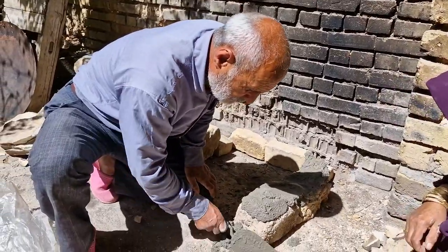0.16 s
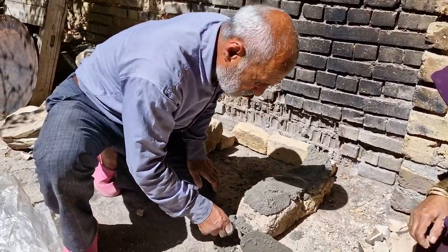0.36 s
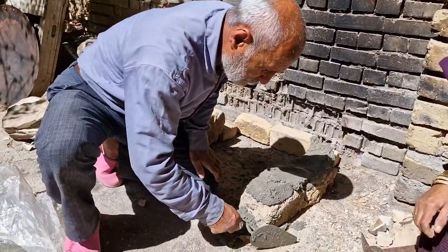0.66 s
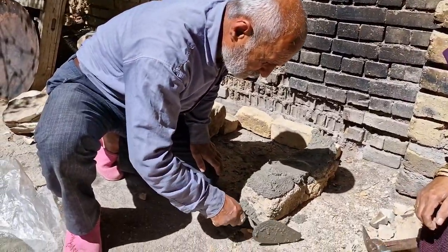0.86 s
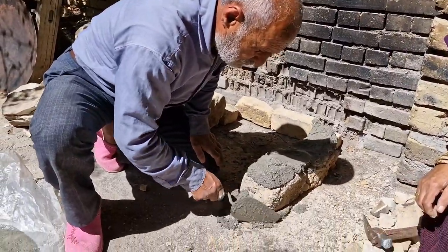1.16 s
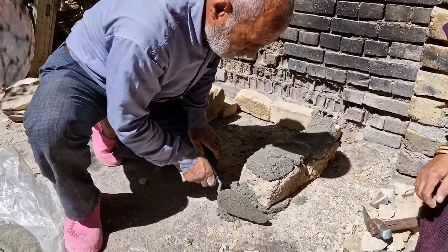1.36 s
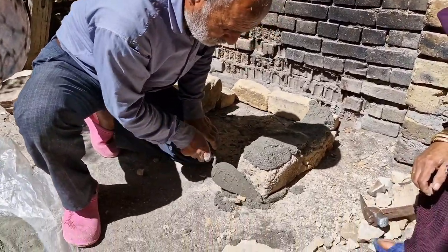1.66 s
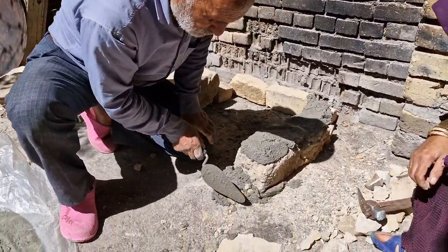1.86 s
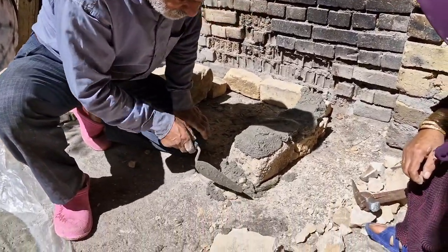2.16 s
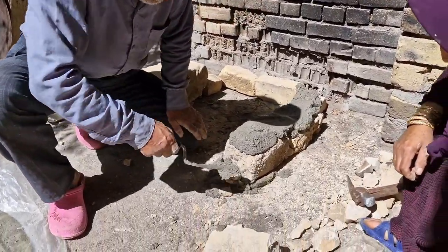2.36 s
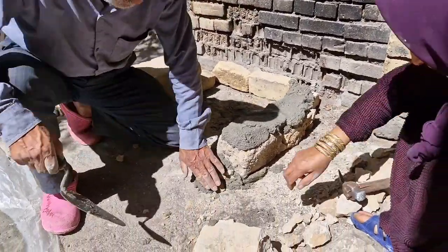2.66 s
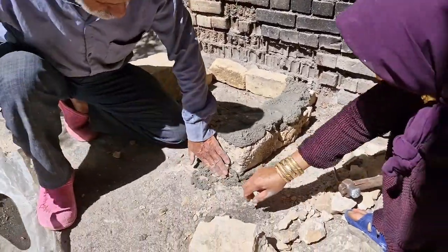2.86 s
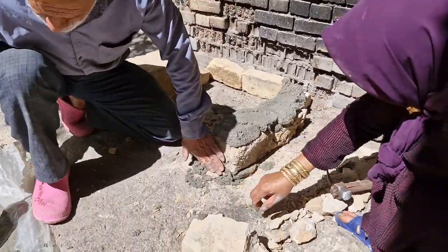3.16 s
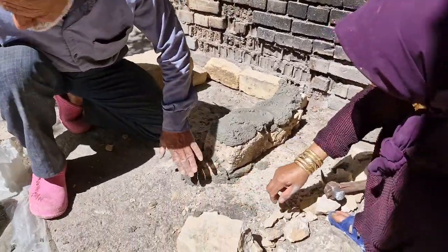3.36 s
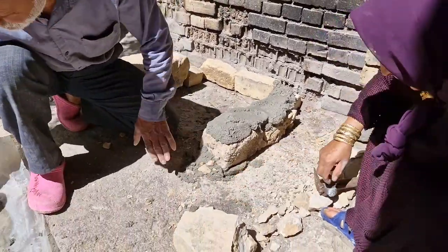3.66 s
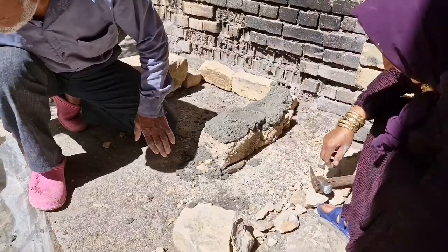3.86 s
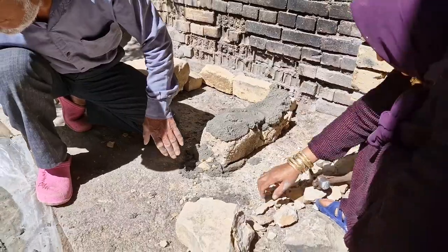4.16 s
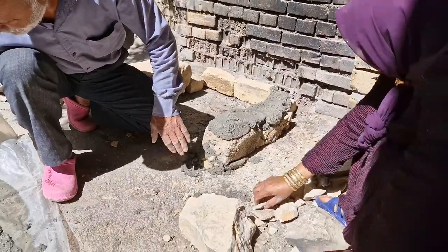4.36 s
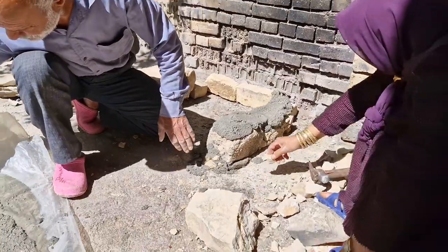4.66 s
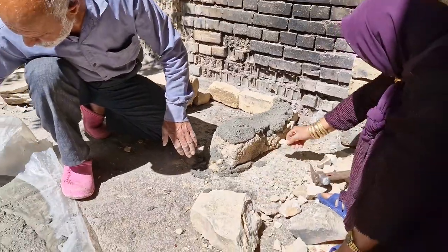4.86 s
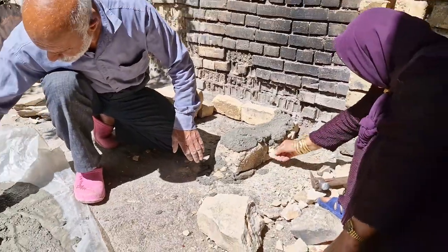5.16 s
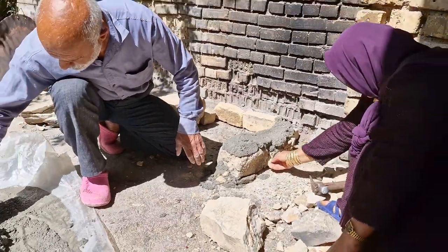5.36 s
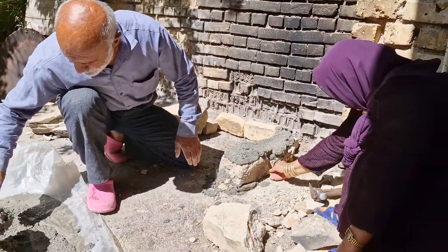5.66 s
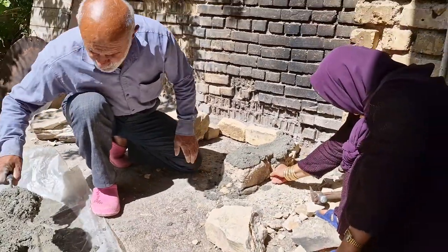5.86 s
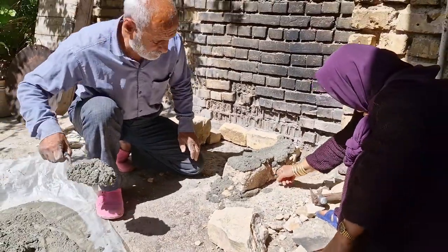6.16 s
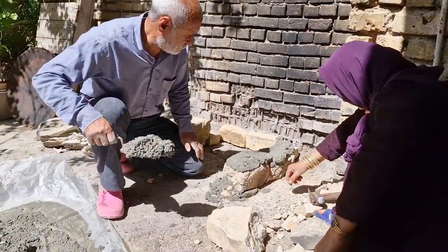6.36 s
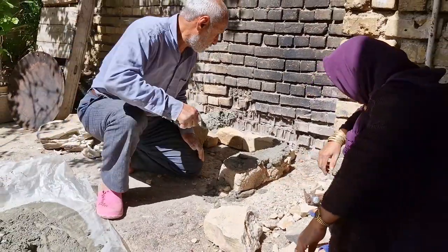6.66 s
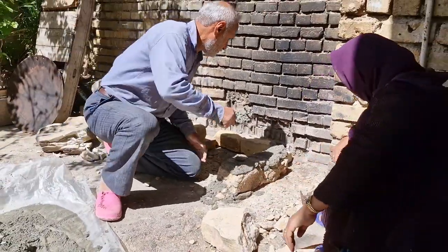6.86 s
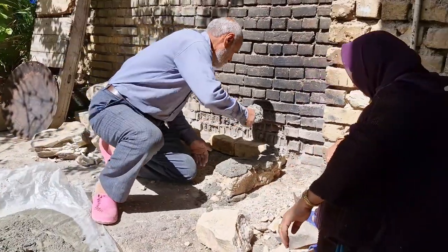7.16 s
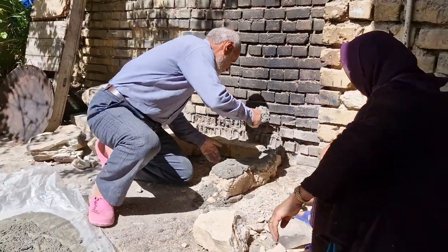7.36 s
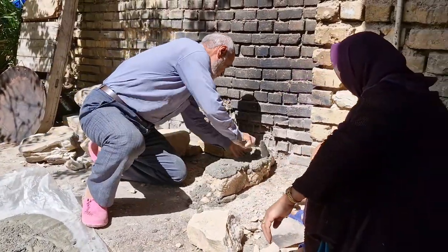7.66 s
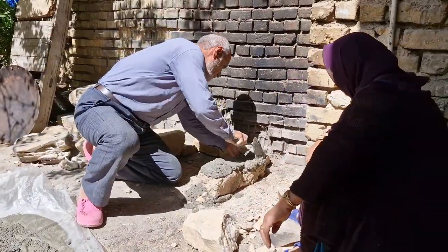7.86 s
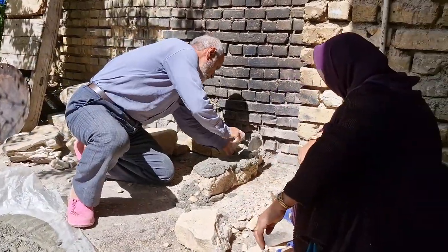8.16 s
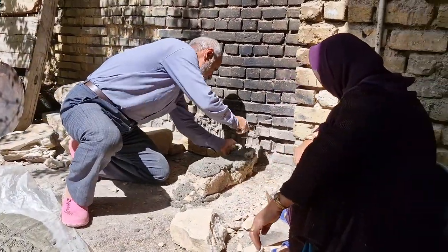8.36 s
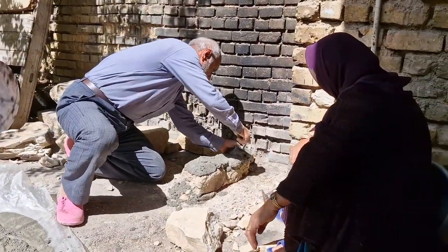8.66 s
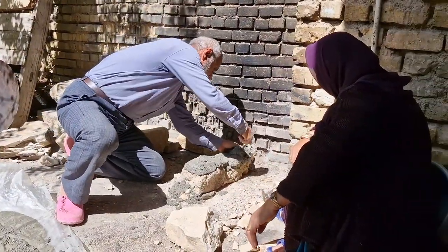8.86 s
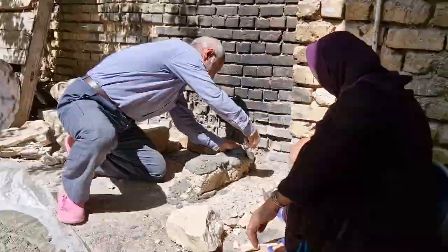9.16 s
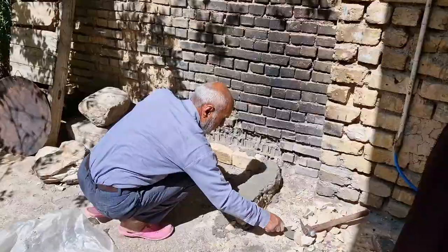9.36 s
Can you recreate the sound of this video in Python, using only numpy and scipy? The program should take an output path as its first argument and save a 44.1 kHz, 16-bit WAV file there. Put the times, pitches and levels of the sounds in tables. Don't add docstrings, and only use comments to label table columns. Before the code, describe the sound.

A steel trowel chops wet mortar and slaps stone in quick close strokes, then grit drags and loose stones knock in a brick yard.

```python
import sys
import numpy as np
from scipy import signal
from scipy.fft import rfft, irfft, next_fast_len
from scipy.io import wavfile
from scipy.ndimage import uniform_filter1d

SR = 44100
rng = np.random.default_rng(int(sys.argv[2]) if len(sys.argv) > 2 else 0)


def generate_wav(sig):
    pcm = np.round(np.clip(np.atleast_2d(sig).T, -1, 1) * 32767).astype(np.int16)
    wavfile.write(sys.argv[1], SR, pcm)


def volts_from_db(level):
    exponent = np.asarray(level, float) / 20
    return 10 ** exponent


N = 419832
SAND_ALIKE = 0.55
TROWEL_LAG, GRIND_LAG, STONE_LAG = 4, 12, 20


def colour(x, points):
    hz, db = np.transpose(points)
    size = next_fast_len(N, True)
    f = np.maximum(np.arange(size // 2 + 1) * SR / size, 1)
    gain = volts_from_db(np.interp(np.log(f), np.log(hz), db, -90, -90))
    y = irfft(rfft(x, size) * gain, size)[..., :N]
    return y / y.std()


def walk(rate):
    k = max(int(SR / rate), 1)
    w = uniform_filter1d(np.repeat(rng.standard_normal(N // k + 1), k), k)[:N]
    return w / w.std()


def ports(points, alike, lag, grain_db, grain_rate=300.):
    grain = volts_from_db(grain_db * walk(grain_rate))
    shared, left, right = rng.standard_normal((3, N)) * grain
    common = np.array([shared, np.roll(shared, lag)])
    own = np.array([left, right])
    return colour(np.sqrt(alike) * common + np.sqrt(1 - alike) * own, points)


def ring(x, modes, scatter_db):
    out = 0
    for (hz, db, t60), (g, d) in zip(modes, rng.standard_normal((len(modes), 2))):
        detuned = hz * (1 + 0.0069 * d)
        pole = np.exp(2j * np.pi * detuned / SR - np.log(1000) / (t60 * SR))
        out = out + volts_from_db(db + scatter_db * g) * signal.lfilter([1], [1, -pole], x).imag
    return out


def contact(t, crack_s, tail_db, t60):
    onset = np.minimum(t * SR / 10, 1)
    return onset * (np.exp(-t / crack_s) + volts_from_db(tail_db - 60 * t / t60))


def thump(t, modes, push_s, scatter_db):
    y = ring(np.gradient(t * np.exp(-t / push_s)), modes, scatter_db)
    return y / np.abs(y).max()


# f/Hz, level/dB per Hz
YARD = [(12, -45), (30, -5), (48, -3), (102, -6), (206, -8.5), (361, -6), (500, -18), (850, -20.5),
        (1500, -28.5), (2400, -25), (3200, -31.5), (6000, -37), (11000, -41.5), (13000, -35.5),
        (16300, -45.5)]


def yard():
    mid, side = (colour(rng.standard_normal(N), YARD) for _ in range(2))
    side = signal.lfilter(*signal.butter(1, 600, "high", fs=SR), side)
    return volts_from_db(-57 + .8 * walk(1.0)) * (mid + side * np.array([[1], [-1]]))


# f/Hz, level/dB, t60/s
BLADE = [(1410, -5, .11), (1490, -7, .19), (1880, -3, .05), (2200, -1, .05), (2575, -1, .1), (3190, 2, .06),
         (3600, 3, .07), (4100, 3, .045), (4800, -4, .035), (5500, 0, .04), (6290, 0, .045),
         (7450, 2, .045), (8750, -1, .04), (12800, 2, .03)]
# f/Hz, level/dB, t60/s
GROUND = [(102.4, -4.5, 0.25), (122.4, 1.5, 0.37), (174, 0.5, 0.12), (265, 9, 0.039), (393, 18, 0.0096),
          (680, -5.5, 0.055)]
# f/Hz, level/dB per Hz
SPIT = [(2650, -28), (4500, 1), (5040, -4.5), (6880, -2.5), (8930, -5), (10700, -11.5), (15000, -5.5),
        (16100, -24), (16500, -43.5)]


def trowel(table, points, crack_s, tail_db, blade_db, favour_db, thud_db, hard_db, flat_t60):
    crunch = ports(points, SAND_ALIKE, TROWEL_LAG, grain_db=1.0)
    spit = ports(SPIT, SAND_ALIKE, TROWEL_LAG, grain_db=2.5, grain_rate=600.)
    out, t = np.zeros((2, N)), np.arange(SR // 3) / SR
    for s, db, treble_db, low_db, hz in table:
        t60 = flat_t60 * (1400 / hz) ** 0.88
        span = slice(int(s * SR), int(s * SR) + len(t))
        noise = crunch[:, span] + volts_from_db(treble_db + 9.5 - 30 * t) * spit[:, span]
        sand = contact(t, crack_s, tail_db, t60) * noise
        blade = ring(sand, BLADE + [(hz, favour_db, .055)], scatter_db=2.5)
        stroke = sand + volts_from_db(blade_db) * blade
        stroke = stroke / np.abs(stroke).max()
        thud = volts_from_db(low_db + thud_db) * thump(t, GROUND, push_s=.0007, scatter_db=3.)
        out[:, span] += volts_from_db(db + hard_db) * (stroke + thud)
    return out


# t/s, crunch peak level/dB, treble and thud level/dB re crunch, loudest ring f/Hz
CHOPS = [(0.0249, -20, -18.5, -10, 1940), (0.0661, -17, -17, -29, 2680), (0.0827, -12.5, -9, -48, 2540),
         (0.1066, -9, -11, -30, 1433), (0.1247, -18, -11, -13, 1437), (0.2342, -41, -11, -32, 1420),
         (0.387, -20, -14, -5, 1940), (0.3948, -31, -34, 6, 1530), (0.406, -24.5, -24, -13, 1980),
         (0.4152, -22.5, -18.5, -18, 2560), (0.4247, -19, -7, -12, 1405), (0.4744, -28.5, -6.5, -12, 1450),
         (0.6492, -20, -18.5, -4, 2520), (0.6646, -23, -15, -6, 2250), (0.6826, -15, -12, -17, 2710),
         (0.6959, -18, -9.5, -24, 2010), (0.7121, -23.5, -16, -4, 2410), (0.9308, -17.5, -7, -13, 2020),
         (0.9509, -24, -17.5, -32, 2060), (0.9649, -35.5, -21, 3, 2270), (1.0147, -47, -13, 11.5, 1480)]
# f/Hz, level/dB per Hz
CHOP = [(240, -5), (400, -12), (1020, -11.5), (1440, -6), (1630, -8), (2540, -5), (2810, -9.5),
        (6000, -19.5), (7800, -99), (13200, -120)]


def chops():
    return trowel(CHOPS, CHOP, crack_s=0.0082, tail_db=-14.5, blade_db=-41.5, favour_db=9.5,
                  thud_db=-1.5, hard_db=4.5, flat_t60=0.22)


# t/s, crunch peak level/dB, treble and thud level/dB re crunch, loudest ring f/Hz
SLAPS = [
    (1.1559, -11.5, -7.5, -32.5, 1385),
    (1.3874, -5, -5.5, -45.5, 7700),
    (1.4012, -23.5, -20.5, -31.5, 2080),
    (1.6335, -13, -14, -33, 2040),
    (1.6441, -24.5, -8.5, -12, 1400),
    (1.69, -37, -6, -7.5, 1474),
    (1.902, -9, 13, -32, 7700),
    (1.9077, -13, -14, -29, 2660),
    (1.9227, -25, -9.5, -15.5, 1410),
    (2.047, -43, -9.5, -14, 1530),
]
# f/Hz, level/dB per Hz
SLAP = [(240, -56.5), (400, -21), (855, -16), (968, -36.5), (1390, -2.5), (1740, -8), (2140, -2),
        (6000, -15.5), (7800, -46.5), (13200, -120)]


def slaps():
    return trowel(SLAPS, SLAP, crack_s=.003, tail_db=-10.5, blade_db=-46.0, favour_db=9.0,
                  thud_db=-1, hard_db=7.0, flat_t60=0.18)


def walls(x, t60, wet_db):
    t = np.arange(SR // 3) / SR
    tail = rng.standard_normal((2, len(t))) * volts_from_db(-60 * t / t60) * (t > .004)
    tail = tail / np.sqrt(np.sum(tail ** 2, 1, keepdims=True))
    return volts_from_db(wet_db) * signal.fftconvolve(x, tail, axes=1)[:, :N]


# t/s, crack peak level/dB, treble and body level/dB re crack, body f/Hz
KNOCKS = [(2.1098, -23.5, -13, -6, 726), (2.716, -41, -24, 4.5, 791), (2.754, -32.5, -18, 5, 2600),
          (2.966, -44.5, 4.5, -6, 110), (3.8651, -42, -25, -18, 161), (4.3994, -39, -18, -7, 273),
          (4.5752, -49.5, -18, 4, 330), (4.695, -40, 18, 1.5, 338), (5.4034, -48, 0, 2.5, 340),
          (5.6602, -57, -27, 15, 117), (5.7276, -52.5, 12, 7, 85.5), (5.7672, -40.5, -16, 0.5, 963),
          (6.597, -39.5, -7.5, -24, 108), (7.003, -48, -15, 14.5, 330), (7.0188, -39, -6, 12, 352),
          (7.0206, -31.5, -4, -5, 1400), (7.206, -40, -7, -12, 253), (7.619, -24, 4, -20, 105),
          (7.678, -49, -9, 13, 120), (7.6889, -47, -21, 15, 247), (9.0725, -38.5, -23, -7, 290),
          (9.136, -36, -19, 5, 2260), (9.17, -32, -9, -5, 103)]


def stones():
    crunch = ports(SLAP, 0.25, STONE_LAG, grain_db=9.0)
    spit = ports(SPIT, 0.29, STONE_LAG, grain_db=-1.5)
    pan = volts_from_db(np.array([[-1.25], [1.25]]))
    out, t = np.zeros((2, N)), np.arange(SR // 4) / SR
    for s, db, treble_db, body_db, hz in KNOCKS:
        span = slice(int(s * SR), int(s * SR) + len(t))
        noise = crunch[:, span] + volts_from_db(treble_db) * spit[:, span]
        crack = contact(t, crack_s=0.00177, tail_db=-16, t60=0.095) * noise
        crack = 2.2 * crack / np.abs(crack).max()
        body = volts_from_db(body_db + 4) * thump(t, [(hz, 0, 13 / hz)], push_s=.2 / hz, scatter_db=0)
        out[:, span] += volts_from_db(db - 5.5) * (crack * pan + body)
    return out


def drag_power(t, rows, rise, hold, hiss_db):
    power = 0
    for s, length, db, grind_db, low_db in rows:
        rising = (s - t) / rise
        releasing = (t - s - hold * length) / (1 - rise - hold)
        away = np.maximum(np.maximum(rising, releasing) / length, 0)
        layers_db = np.array([[0], [hiss_db], [grind_db], [low_db]])
        power = power + volts_from_db(2 * layers_db) * volts_from_db(2 * (db - 17.5 * away))
    return power


# t/s of full pressure, length/s, rasp level/dB, grind and rumble level/dB re rasp
BRUSHES = [
    (2.14, 0.054, -72.5, 4.5, 23),
    (2.33, 0.11, -68, -17, 9),
    (3.06, 0.065, -68.5, -14, 6),
    (5.3, 0.41, -65.5, -3.5, 6),
    (6.815, .12, -62.5, -7.5, -5),
    (7.73, 0.17, -67, -4, 3),
    (8.53, 0.35, -66.5, -11, -8),
    (8.97, 0.18, -71, -9, -1),
]
PUSHES = [
    (2.718, 0.24, -55.5, -4, -8),
    (5.02, 0.25, -49, -3, -5.5),
]
SHOVES = [
    (2.845, 0.21, -53.5, -17, 12),
    (4.21, 0.38, -47, -10.5, 3),
    (4.78, 0.25, -46, -8.5, 0),
    (5.0, 0.6, -49, -4.5, -2),
    (5.67, 0.11, -63.5, 0, 15),
    (5.73, 0.087, -57.5, -7, 11.5),
    (5.77, 0.088, -61, 2, -9),
    (7.694, 0.1, -62, 1, 22.5),
]
SKIDS = [
    (3.825, 0.044, -63, -1, 0),
    (3.865, 0.13, -56.5, -12, 2),
    (3.968, 0.35, -42, -22, -9.5),
    (4.33, 0.37, -57, -1.5, 2.5),
    (4.695, 0.12, -53, -9, -16),
    (7.614, 0.12, -44.5, -9.5, 4),
    (8.506, 0.041, -53, -18, -9),
]
SCRAPES = [
    (9.03, .1, -65, -6, 4.5),
    (9.075, 0.25, -53, -12, -7.5),
    (9.262, 0.26, -34.5, -17.5, -12),
    (9.4, 0.1, -44.5, -7, 2.5),
    (9.51, 0.045, -46.5, -17, -6),
]


def pressure(t):
    return (1e-12 + drag_power(t, BRUSHES, rise=0.068, hold=0.7, hiss_db=3)
            + drag_power(t, PUSHES, rise=0.094, hold=0.42, hiss_db=-4.8)
            + drag_power(t, SHOVES, rise=0.6, hold=0.026, hiss_db=-1.5)
            + drag_power(t, SKIDS, rise=0.1, hold=0.017, hiss_db=-2.5)
            + drag_power(t, SCRAPES, rise=0.12, hold=0.48, hiss_db=-11.5))


# f/Hz, level/dB per Hz
RASP = [(710, -26.5), (1200, -3), (1460, -1), (1790, -1), (1920, -3), (2470, 0.5), (6000, -15), (7800, -59),
        (13200, -120)]
# f/Hz, level/dB per Hz
HISS = [(2350, -35.5), (4000, -3), (6350, -7), (8910, -4), (11400, -11), (12600, -5), (14900, -7.5),
        (16100, -20.5), (16500, -53)]
# f/Hz, level/dB per Hz
GRIND = [(400, -9), (600, -4.5), (820, 5.5), (1100, -2), (1500, -8.5)]
# f/Hz, level/dB per Hz
RUMBLE = [(40, -10), (80, -2.5), (200, -4), (400, -5.5), (700, -21.5)]
# t/s, f/Hz, level/dB re rasp
HOLLOW = [(2.75, 2514, -10), (2.86, 1945, 0), (4.0, 2196, -3), (4.15, 1924, -0.5), (4.75, 2090, -4.5),
          (5.08, 2307, 0), (6.85, 4230, -26), (7.62, 2306, -23), (8.8, 2335, 3), (9.0, 2310, 11.5),
          (9.22, 2245, -2), (9.26, 1647, -1.5), (9.5, 1780, -6)]


def drags():
    t = np.arange(N) / SR
    coarse = t[::64]
    levels = 10 * np.log10(pressure(coarse))
    rasp_db, hiss_db, grind_db, low_db = (np.interp(t, coarse, level) for level in levels)
    when, hollow_hz, hollow_level = np.transpose(HOLLOW)
    hz, hollow_db = np.interp(t, when, hollow_hz), np.interp(t, when, hollow_level)
    jerks = volts_from_db(1.6 * walk(55))
    rasp = ports(RASP, SAND_ALIKE, STONE_LAG, grain_db=1.0)
    turn = 2 * np.pi * np.cumsum(hz) / SR
    narrow = ports([(10, -11.5), (120, 0.5), (400, -30)], 0.46, STONE_LAG, grain_db=-2.0)
    hollow = narrow * np.cos([turn, np.roll(turn, STONE_LAG)])
    hiss = ports(HISS, 0.067, STONE_LAG, grain_db=2.0, grain_rate=500.)
    grit = rasp + volts_from_db(hollow_db) * hollow + volts_from_db(hiss_db - rasp_db + 2.5) * hiss
    high = volts_from_db(rasp_db + 0.5) * jerks * grit
    grind = volts_from_db(grind_db + 3.5 + 2.8 * walk(60)) * ports(GRIND, 0.9, GRIND_LAG, grain_db=1.0)
    rumble = volts_from_db(low_db - 1.5 + 2.5 * walk(30)) * colour(rng.standard_normal(N), RUMBLE)
    return high + grind + rumble


# t/s, length/s, start f/Hz, end f/Hz, level/dB
CHIRPS = [
    (2.51, .08, 4900, 3900, -72),
    (3.23, .08, 4700, 4200, -74),
    (3.56, .17, 4500, 2900, -70),
    (5.85, .15, 4600, 2500, -71),
    (6.05, .08, 4600, 4100, -76),
    (6.45, .14, 4500, 3000, -73),
    (7.3, .17, 4500, 2700, -72),
    (8.0, .1, 4000, 3100, -72),
    (8.74, .1, 4000, 3400, -75),
]


def sparrows():
    out, warble_hz = np.zeros(N), 170 * walk(250)
    for s, length, hz0, hz1, db in CHIRPS:
        u = np.linspace(0, 1, int(length * SR))
        span = slice(int(s * SR), int(s * SR) + len(u))
        trill_hz = 260 * np.sin(2 * np.pi * 22 * u * length)
        hz = hz0 + (hz1 - hz0) * u + trill_hz + warble_hz[span]
        out[span] += volts_from_db(db) * np.sin(np.pi * u) * np.sin(2 * np.pi * np.cumsum(hz) / SR)
    return out * (.9 + .6 * walk(400))


# f/Hz, level/dB, t60/s
FLICK = [(430, 0, .018), (950, -19, .1), (1500, 1, .004)]


def flick():
    out, t = np.zeros(N), np.arange(SR // 4) / SR
    start = int(8.1272 * SR)
    tick = 1.7 * np.sin(2 * np.pi * 3200 * t) * np.exp(-t / .00012)
    case = thump(t, FLICK, push_s=.0002, scatter_db=0)
    out[start:start + len(t)] = volts_from_db(-25) * (case + tick)
    return out * np.array([[volts_from_db(-15)], [1]])


def scene():
    work = chops() + slaps() + stones() + drags()
    work = signal.lfilter(*signal.butter(2, 55, "high", fs=SR), work)
    birds = sparrows()
    echoes = walls(work, t60=0.2, wet_db=-9) + walls(np.array([birds, birds]), t60=0.15, wet_db=1)
    return work + echoes + yard() + birds + flick()


def roll_off(x):
    return signal.sosfilt(signal.butter(12, 17130, fs=SR, output="sos"), x)


def record(dry):
    t = np.arange(N) / SR
    gap_start_s, gap_end_s = 9.222, 9.254
    duck_db, knee_db, duck_s = 2, -43.5, 0.33
    gate = np.clip(np.maximum((gap_start_s - t) / 0.014, (t - gap_end_s) / 0.0036), 0, 1)
    keep = np.exp(-1 / (duck_s * SR))
    loud = signal.lfilter([1 - keep], [1, -keep], np.mean(dry ** 2, 0))
    duck = volts_from_db(-duck_db * loud / (loud + volts_from_db(2 * knee_db)))
    return roll_off(dry * gate * duck)


dry = scene()
out = record(dry)
generate_wav(out)
```